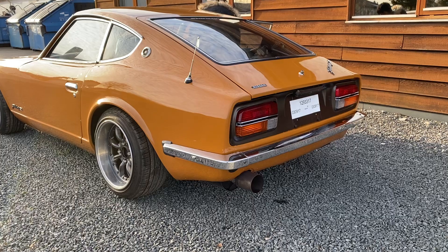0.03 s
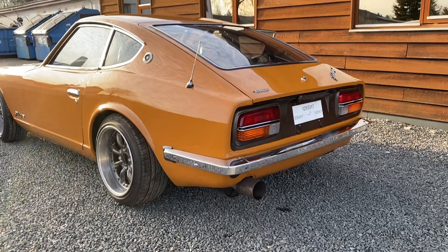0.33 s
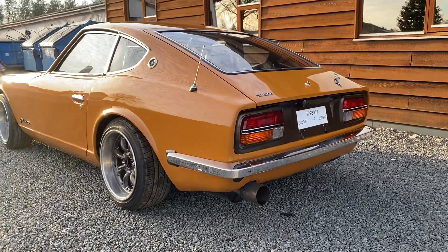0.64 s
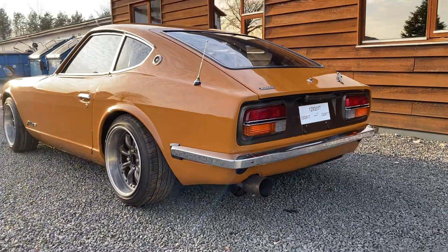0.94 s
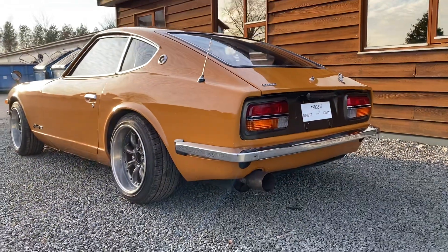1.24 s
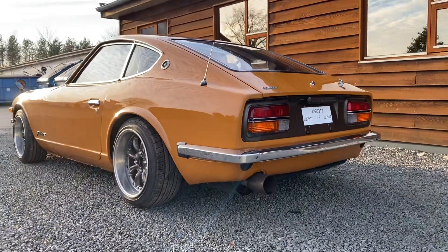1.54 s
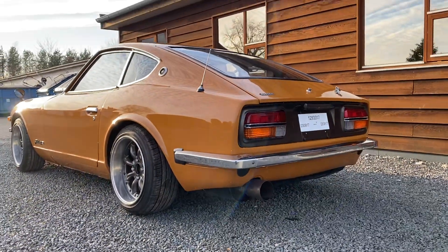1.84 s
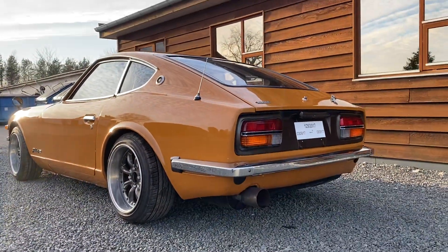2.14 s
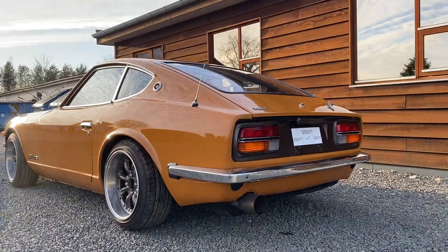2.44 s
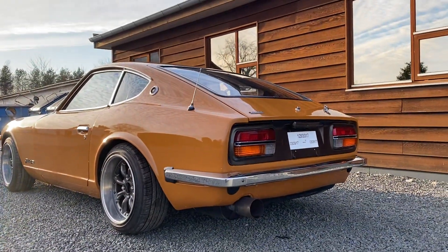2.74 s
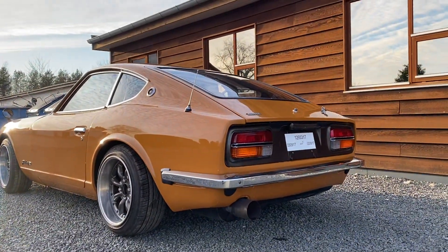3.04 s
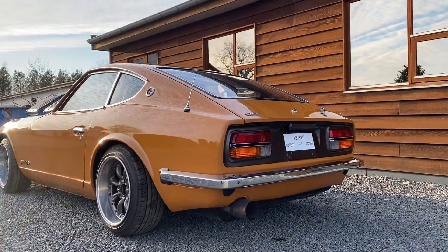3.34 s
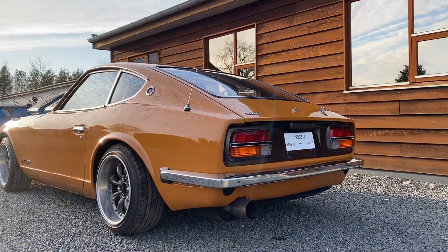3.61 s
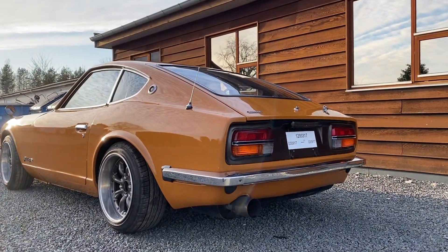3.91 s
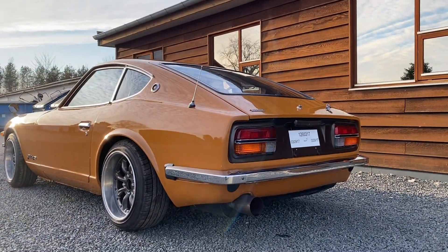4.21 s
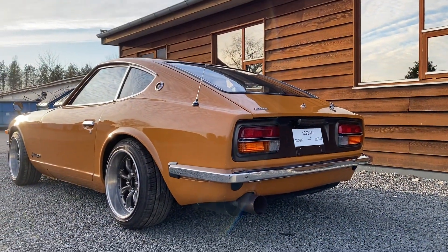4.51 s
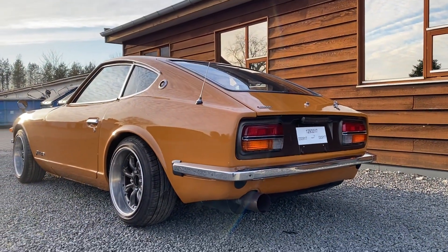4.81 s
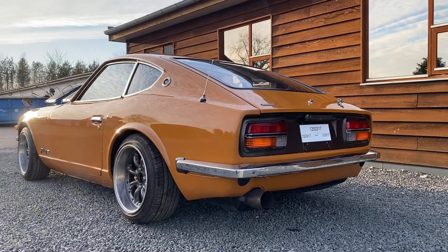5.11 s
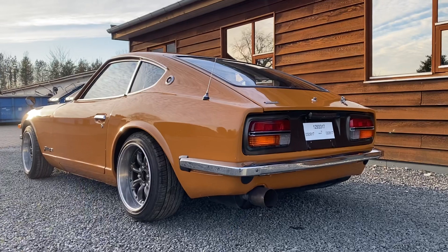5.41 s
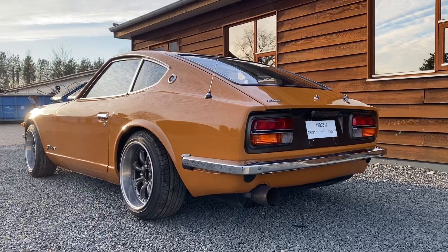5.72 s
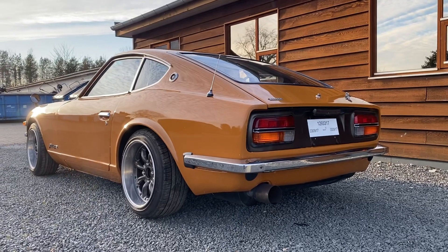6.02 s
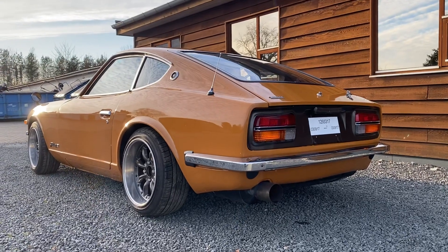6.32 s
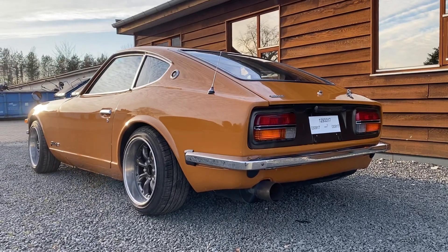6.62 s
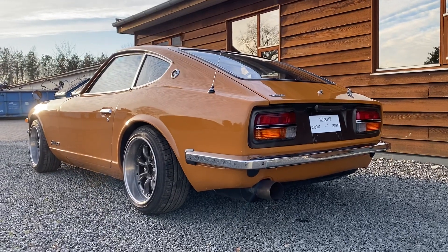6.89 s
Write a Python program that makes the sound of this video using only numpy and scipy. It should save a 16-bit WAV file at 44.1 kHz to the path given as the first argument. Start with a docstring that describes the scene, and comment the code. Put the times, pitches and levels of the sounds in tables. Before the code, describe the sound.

After a short crackle, a sports car's six-cylinder engine idles unevenly, with a booming exhaust, light ticking and a small bird calling very faintly. Two smooth revs follow about two seconds apart, the second rising higher into a raspy snarl. Each sinks away with burbles, small exhaust pops and soft whines. The microphone is just behind the car, in an open gravel yard with little echo.

```python
"""A short crackle, then a lumpy idle: a straight-six sports car parked on gravel in a yard, with the
microphone behind its tailpipe. Firing pulses boom in the silencer, valves tick, thin steel rings and a
small bird calls faintly. Revved twice, the carburettors roar and the pipe blares; as the revs sink it
burbles, whines and pops with unburnt fuel. A wooden wall answers, and a limiter holds the peaks down."""
import sys
import numpy as np
from scipy import signal
from scipy.fft import rfft, irfft, next_fast_len
from scipy.io import wavfile
from scipy.ndimage import uniform_filter1d, minimum_filter1d, map_coordinates

SR = 44100
rng = np.random.default_rng(int(sys.argv[2]) if len(sys.argv) > 2 else 0)


def file_out(sig):
    """Save sig as 16-bit WAV at sys.argv[1]."""
    # one column per channel
    cols = np.atleast_2d(sig).T
    # limit, then scale
    lim = np.clip(cols, -1, 1)
    pcm = np.round(lim * 32767).astype(np.int16)
    wavfile.write(sys.argv[1], SR, pcm)


N = 306495
TIME = np.arange(N) / SR
IDLE_HZ = 67.2  # firing rate at idle, six firings to an engine cycle

# blips of the throttle: opens t/s, shuts t/s, climb of the firing rate/(Hz per s)
BLIPS = [(2.835, 3.49, 205), (4.765, 5.472, 244)]
# cylinders in firing order: relative strength, lateness/firings
CYLINDERS = [(1.079, 0), (0.63, .08), (0.822, -0.019), (0.92, .11), (0.99, -.07), (1.1, .04)]
# gas noise in the exhaust: firing rate f/Hz, throttle open level/dB, throttle shut level/dB
GAS_FLOW = [(68, -26, -35), (114, -28, -35), (154, -25, -32), (182, -24.5, -29), (242, -21, -24),
            (270, -19.5, -19.5)]


def amp(db):
    """Decibels to gain."""
    return 10 ** (np.asarray(db) / 20)


def ramp(x):
    """Limit to the range 0-1."""
    return np.clip(x, 0, 1)


def unit(x):
    """Scale to rms 1."""
    return x / np.sqrt(np.mean(x ** 2) + 1e-20)


def steady(x, span_s):
    """Hold the running rms near 1."""
    size = max(int(span_s * SR / 2), 8)
    return x / np.sqrt(np.abs(uniform_filter1d(uniform_filter1d(x ** 2, size), size)) + 1e-12)


def along(points, hz):
    """Read (f/Hz, value) points on a log frequency axis."""
    f, value = np.transpose(points)
    return np.interp(np.log(hz + 1), np.log(f + 1), value)


def mapped(table, rate, throttle):
    """Level in dB at this firing rate, between the shut and the open throttle."""
    hz, open_db, shut_db = np.transpose(table)
    return throttle * np.interp(rate, hz, open_db) + (1 - throttle) * np.interp(rate, hz, shut_db)


def wobble(rate):
    """A smooth random curve, rate knots a second."""
    return map_coordinates(rng.standard_normal(int(N * rate / SR) + 4), [TIME * rate])


def fade(kicks, decay_s):
    """Each kick dies away exponentially."""
    return signal.lfilter([1], [1, -np.exp(-1 / (decay_s * SR))], kicks)


def filtered(x, response):
    """Filter x by a function of frequency."""
    size = next_fast_len(N + SR // 2)
    return irfft(rfft(x, size) * response(np.fft.rfftfreq(size, 1 / SR)), size)[..., :N]


def ring(x, colour, size=16384):
    """Send pulses through a minimum-phase body of this colour."""
    cepstrum = irfft(np.log(amp(along(colour, np.fft.rfftfreq(size, 1 / SR)))))
    cepstrum[1:size // 2] *= 2
    cepstrum[size // 2 + 1:] = 0
    return signal.fftconvolve(x, irfft(np.exp(rfft(cepstrum))))[:N]


def rush(colour, gate):
    """Gated, coloured stereo noise of rms 1, widest around 2 kHz."""
    # likeness of left and right at the microphone: f/Hz, correlation
    likeness = [(120, 0.63), (250, 0.77), (500, 1), (1000, 0.77), (2000, 0.51), (4000, 0.91), (8000, 0.94)]
    angle = lambda hz: np.arccos(np.clip(along(likeness, hz), -1, 1)) / 2
    response = lambda hz: amp(along(colour, hz)) * [np.cos(angle(hz)), np.sin(angle(hz))]
    mid, side = filtered(rng.standard_normal((2, N)) * gate, response)
    return unit(np.array([mid + side, mid - side]))


def pulses(phase, places, sizes):
    """One impulse wherever the phase passes one of the places."""
    samples = np.interp(places, phase, np.arange(N)).astype(int)
    return np.bincount(samples, sizes, N) * (TIME > 0) * (TIME < TIME[-1])


def tone(phase, fitful):
    """A tone of rms about 1; its fitful share drifts in strength and phase."""
    drift = (wobble(13) + 1j * wobble(13)) / np.sqrt(2)
    envelope = np.sqrt(1 - ramp(fitful)) + np.sqrt(ramp(fitful)) * drift
    return np.sqrt(2) * np.real(envelope * np.exp(2j * np.pi * phase))


def glides(notes, flicker):
    """Thin, unsteady tones that swell and fade while bending through three pitches."""
    song = np.zeros(N)
    for start, length, *pitches, db in notes:
        progress = ramp((TIME - start) / length)
        hz = np.polyval(np.polyfit([0, .5, 1], pitches, 2), progress)
        song += amp(db) * np.sin(np.pi * progress) * np.sin(2 * np.pi * np.cumsum(hz) / SR)
    return song * (1 + flicker * wobble(55))


def crackles(click_db=-1, knock_db=-2, grains_per_s=2200):
    """Sharp clicks and knocks of gravel and engine rattle; clusters of tiny grains crackle and crunch."""
    # gravel, and engine rattle as the throttle opens: t/s, level/dB, knock's extra level/dB
    hits = [(0.448, -36.5, -0.5), (0.634, -36, 3.5), (0.757, -35, 0), (0.7734, -27, -2.5),
            (0.9485, -31, 5.5), (1.433, -28, -7), (1.7726, -34, -0.5), (2.222, -35.5, 2.5),
            (2.416, -32, -5.5), (2.7804, -34, -3.5), (2.807, -35.5, 8), (2.8894, -27, -2.5),
            (4.1617, -32.5, -4.5), (4.437, -37.5, 5), (4.601, -33.5, -2), (4.8026, -23, -1.5)]
    # a short crackle at the very start, then faint gravel crunches: middle t/s, length/s, level/dB
    bursts = [(0.018, 0.061, -34), (0.64, 0.058, -48.5), (.72, .025, -39.5), (0.764, 0.025, -42.5)]
    # colours of click, crunch and knock: f/Hz, level/dB
    click_colour = [(600, -20), (1500, 10), (3000, 10.5), (6500, -4.5), (12000, -15), (15500, -16.5)]
    crunch_colour = [(700, -5), (1600, 8), (4000, -1), (7000, -6.5), (12000, -1), (15500, -7.5)]
    knock_colour = [(400, -7.5), (950, 3.5), (1500, 6.5), (2100, -0.5), (3500, -27)]
    clicks, knocks = np.zeros((2, N))
    for t, db, body_db in hits:
        clicks[int(t * SR)] = amp(db + click_db)
        knocks[int(t * SR)] = amp(db + body_db + knock_db)
    grains = (rng.random(N) < grains_per_s / SR) * amp(3 * rng.standard_normal(N))
    swell = sum(amp(db) * np.exp(-2 * ((TIME - t) / length) ** 2) for t, length, db in bursts)
    click = fade(clicks, decay_s=.0017) * rush(click_colour, 1)
    crunch = steady(fade(grains, decay_s=.00065), 0.27) * swell * rush(crunch_colour, 1)
    knock = fade(knocks, decay_s=.0046) * rush(knock_colour, 1)
    return click + crunch + knock


def pedal(open_s=0.16, shut_s=0.05):
    """Throttle opening 0-1: open, hold and shut for each blip."""
    return sum(ramp(.5 + (TIME - opens) / open_s) * ramp(.5 - (TIME - shuts) / shut_s)
               for opens, shuts, _ in BLIPS)


def crank(throttle, coast_s=1.8, sag_hz=7, boom_hz=205, hunt_hz=.6, flutter_hz=.9):
    """Firing rate in Hz: it climbs while the throttle is open, then friction runs it down."""
    rate = np.full(N, IDLE_HZ)
    for opens, shuts, climb in BLIPS:
        pulled = rate[int(opens * SR)] + climb * (np.minimum(TIME, shuts) - opens)
        rate = np.where(TIME > opens, pulled * np.exp(-np.maximum(TIME - shuts, 0) / coast_s), rate)
    rate -= sag_hz * throttle * np.exp(-((rate - boom_hz) / 24) ** 2)  # back-pressure at the boom
    return uniform_filter1d(rate, size=SR // 20) + hunt_hz * wobble(4) + flutter_hz * wobble(24)


def off_idle(rate):
    """0 at idle, rising to 1 at 97 firings a second."""
    return ramp((rate - 72) / 25)


def unevenness(rate, throttle, starve_hz=237.8, pull_hz=175, surge_db=2):
    """How roughly the engine runs, blended from idling, coasting, starving and pulling."""
    # burble level/dB, single cylinders level/dB, bank imbalance level/dB
    idling, coasting, starving = (-15, -58, -52), (-15, -18.5, -17), (-20.5, -15, -8.5)
    pulling, pull_per_octave = (-22, -13.5, -19.5), (-7, 4.5, 13.5)
    fast = off_idle(rate)
    starved = ramp(.5 + (rate - starve_hz) / 6)  # coasting this fast, one bank of three drops out
    shut = np.outer(idling, 1 - fast) + np.outer(coasting, fast - starved) + np.outer(starving, starved)
    loaded = np.array(pulling)[:, None] + np.outer(pull_per_octave, np.log2(rate / pull_hz))
    burble_db, single_db, bank_db = throttle * loaded + (1 - throttle) * shut
    moving = np.sin(np.pi * throttle)  # peaks at half travel
    return burble_db + surge_db * moving, single_db, bank_db


def exhaust_note(rate, phase, throttle, burble_db, single_db, bank_db, misfire_s=0.012, dull_db=4):
    """The firing rate booms in the silencer; unequal cylinders add tones between its multiples."""
    # silencer boom: firing rate f/Hz, throttle open level/dB, throttle shut level/dB
    boom_levels = [(70.4, -1, -8), (104, -4, -19.5), (125, -2.5, -16), (150, -5, -19), (195, -5, -12),
                   (199, -2.5, -22), (222.5, -15.5, -24), (275, -21, -25)]
    # silencer response: f/Hz, level/dB
    silencer = [(25, -22), (55, -15), (85, -2.5), (205, 0.5), (250, 1.5), (300, -0.5), (380, -6.5),
                (480, -37), (900, -25)]
    # missed charges at idle: t/s, depth 0-1
    misfires = [(0.182, 0.97), (0.213, 1), (.35, 0.8), (0.396, 0.64), (0.576, 0.7), (.65, 0), (0.809, .9),
                (.885, 0), (0.988, 1), (1.115, 0.7), (1.22, 0.6), (1.446, 0.6), (1.56, 0.5), (1.625, 0.2),
                (1.744, 0.6), (1.791, 0.9), (1.86, 0.4), (1.92, 0.14), (1.995, 0.77), (2.154, 0.63),
                (2.187, 0.74), (2.35, 0.8), (2.515, 0.87)]
    # tones of unequal cylinders: multiple of the cycle rate, level/dB
    lope_orders = [(2, 1.5), (4, 2), (5, -5.5), (7, -6), (8, -8), (9, -7.5)]
    pipe = lambda multiple: amp(along(silencer, multiple * rate))
    idling = ramp((112 - rate) / 18)
    # at low revs some charges burn poorly
    weak = np.minimum(0.014 * rng.exponential(size=int(phase[-1]) + 2) ** 2.8, 1)
    strength = 1 - idling * map_coordinates(weak - weak.mean(), [phase])
    strength *= 1 + idling * 0.055 * wobble(IDLE_HZ)
    strength *= 1 - ramp(sum(depth * np.exp(-((TIME - t) / misfire_s) ** 2) for t, depth in misfires))
    # overtones skew each pressure wave, no two with the same edge
    overtones = np.zeros(N)
    for k, db in [(2, -6), (3, -15)]:
        level = np.sqrt(2) * amp(db + 2 * wobble(40)) * pipe(k)
        skew = -0.56 + 0.25 * wobble(45)
        overtones += level * np.cos(2 * np.pi * k * phase + (k - 1) * skew)
    # with the throttle shut above idle, misfires make the tones come and go
    shut = 1 - ramp(2 * throttle)
    fitful = 0.92 * ramp((burble_db + 25) / 6) * (1 - idling) * shut
    wave = tone(phase, fitful / 2) + np.maximum(idling, .1) * overtones
    boom = amp(mapped(boom_levels, rate, throttle)) * strength * wave
    count, lope = len(CYLINDERS), np.zeros(N)
    for k, db in lope_orders:
        level = amp(db - dull_db * shut * np.log2(k / 2)) * pipe(k / count)  # duller without load
        lope += level * tone(k * phase / count + rng.random(), np.clip(fitful, .1, 1))
    return boom + amp(bank_db) * tone(phase / 2, fitful) + amp(single_db) * steady(lope, 0.69)


def burble(rate, phase, burble_db, idle_db=-1, coast_db=4, flare_db=6.5):
    """Charges of random strength thump through the pipe; above idle a few flare far above the rest."""
    # colour of the pipe at idle and at higher revs: f/Hz, level/dB
    idle_colour = [(25, -19), (45, -28.5), (62, 0), (90, 9), (115, -2.5), (175, 3), (205, -9), (245, -12.5),
                   (305, -6), (370, -28.5), (600, -78)]
    coast_colour = [(25, -65), (42, -9.5), (58, 13), (80, 9.5), (115, 5), (150, 1), (200, 5.5),
                    (245, -15.5), (305, -5), (380, -40.5), (650, -78)]
    firing = np.arange(int(phase[-1]))
    late, size, flare = rng.standard_normal((len(firing), 3)).T
    thumps = pulses(phase, firing + 0.049 * late, size)
    flares = pulses(phase, firing + 0.091 * late, size * amp(flare_db * flare))
    idle = amp(idle_db) * steady(ring(thumps, idle_colour), 0.51)
    overrun = amp(coast_db) * steady(ring(flares, coast_colour), .22)
    fast = off_idle(rate)
    return amp(burble_db) * ((1 - fast) * idle + fast * overrun)


def gas(rate, phase, throttle, snarl_hz=213, snarl_span_hz=55, snarl_lag_s=.02):
    """Each exhaust valve lets out a bark and a puff of turbulence; open carburettors add intake roar."""
    # colours of exhaust rasp, intake and high-rev snarl: f/Hz, level/dB
    rasp_colour = [(200, -25.5), (330, 6.5), (410, 1.5), (540, -2.5), (650, 0), (820, -7), (1060, -8),
                   (1350, -13), (1650, -18.5), (2300, -26), (3500, -45.5), (8000, -99)]
    intake_colour = [(200, -16), (290, 11.5), (370, 13), (520, 0.5), (900, -11), (1300, -6), (1900, -5.5),
                     (2250, -26), (2900, -15.5), (5000, -55.5)]
    snarl_colour = [(220, -21.5), (360, 6.5), (430, 9.5), (540, 0.5), (640, 5), (750, 5), (900, -2.5),
                    (1120, -1), (1500, -7.5), (2200, -18), (3300, -15), (4400, -19.5), (6500, -40)]
    # two bright hisses: f/Hz, level/dB
    bright_hiss = [(1000, -43), (2000, 11), (3000, 10.5), (4400, 8.5), (5500, -3), (7500, 2.5), (9000, -20),
                   (11000, 2), (15500, -24)]
    high_hiss = [(3000, -21.5), (6500, 7), (9000, -14), (15500, 10)]
    # strength of the hiss: firing rate f/Hz, throttle open level/dB, throttle shut level/dB
    hiss_flow = [(68, -43.5, -53), (105, -46, -54.5), (194, -44.5, -45), (232, -39.5, -39.5),
                 (271, -31.5, -33)]
    # extra roar of each blip: t/s, level/dB
    effort = [(3.2, 1.4), (5.2, -0.5)]
    firing = np.arange(int(phase[-1]))
    strength, late = np.array(CYLINDERS)[firing % len(CYLINDERS)].T
    jitter, size = rng.standard_normal((len(firing), 2)).T
    barks = pulses(phase, firing + late + .035 * jitter, strength * amp(2.5 * size))
    barking = lambda colour: steady(ring(barks, colour), 0.23)
    puffs = np.exp(0.16 * np.cos(2 * np.pi * phase)) * np.interp(phase, firing, np.sqrt(strength))
    rasp = amp(-1) * rush(rasp_colour, puffs) + amp(-10) * barking(rasp_colour)
    intake = amp(-0.5) * (1.26 * rush(intake_colour, puffs) + 0.5 * barking(intake_colour))
    # the barks harden into a snarl near the top of the revs
    top = ramp((np.interp(TIME - snarl_lag_s, TIME, rate) - snarl_hz) / snarl_span_hz)
    snarl = amp(-6) * (rush(snarl_colour, puffs ** 2) + barking(snarl_colour))
    roar = (0.98 + 0.095 * throttle) * (1 - top / 2) * rasp + top * snarl
    roar += throttle * (1 + 0.14 * top) * intake
    hiss = rush(bright_hiss, puffs) + amp(-7) * throttle * barking(bright_hiss)
    hiss += amp(-7) * (rate / rate.max() + .45 * throttle) * rush(high_hiss, puffs ** .5)
    roar_db = mapped(GAS_FLOW, rate, throttle) + throttle * np.interp(TIME, *np.transpose(effort))
    hiss_db = mapped(hiss_flow, rate, throttle)
    return amp(roar_db + 0.44 * wobble(12)) * roar + amp(hiss_db + 0.69 * wobble(13)) * hiss


def afterblow(rate, throttle, thumps, blow_db=-3, idle_share=0.43):
    """With the throttle shut, every thump pushes a gust through the tailpipe, which rings hollow."""
    # colour of the tailpipe: f/Hz, level/dB
    hollow = [(200, -11), (310, 7.5), (400, -9), (480, 5.5), (560, -1.5), (660, 1), (900, -4), (1045, -4),
              (1130, -3.5), (1380, -11.5), (1620, -9), (2300, -25), (5000, -52)]
    push = np.abs(uniform_filter1d(steady(thumps, 1.0) ** 2, size=400)) ** 0.2
    share = (1 - throttle) * np.maximum(off_idle(rate), idle_share)
    return amp(mapped(GAS_FLOW, rate, throttle) + blow_db) * share * rush(hollow, push)


def valves(rate, phase, throttle, tick_db=-54, rattle_db=-38):
    """Tappets tick unevenly, twice a firing; a throttle opened at low revs rattles on every firing."""
    # bright tick: f/Hz, level/dB
    bright_tick = [(1000, -12.5), (1800, 4.5), (2800, 11), (6500, 1), (9000, -19.5), (15500, -12)]
    # rattle, strongest near 3 kHz: f/Hz, level/dB
    rattle_colour = [(1000, -14.5), (2800, 6), (4200, -0.5), (6300, -0.5), (9000, -14), (15500, -21.5)]
    firing = np.arange(int(phase[-1]))
    hard, soft = amp(np.minimum(4.5 * rng.standard_normal((len(firing), 2)), 8)).T
    taps = pulses(phase, firing + .3, hard) + pulses(phase, firing + .72, soft / 2)
    spits = np.exp(1.6 * np.cos(2 * np.pi * phase)) * amp(4 * wobble(70))
    lugging = ramp(1.5 * throttle) * ramp((104 - rate) / 26)
    ticks = rush(bright_tick, fade(taps, decay_s=0.0012))
    return amp(tick_db) * ticks + amp(rattle_db) * lugging * rush(rattle_colour, spits)


def tinwork(rate, throttle, ring_db=-9, idle_share=0.55):
    """The gas flow shakes the exhaust's thin steel, which rings at its own pitches, least at idle."""
    # modes of the steel: f/Hz, width/Hz, level/dB
    modes = [(651, 26, 7.5), (1045, 78, 6), (1534, 35, -1.5), (1746, 12, -6), (2860, 21, -10.5),
             (3976, 37, -10.5), (4580, 22, -10), (4990, 31, -16), (6105, 44, -23.5)]
    response = lambda f: sum(amp(db) * 1j * f * width / (hz * hz - f * f + 1j * f * width)
                             for hz, width, db in modes)
    ringing = unit(filtered(rng.standard_normal(N), response))
    shaken = np.maximum(ramp(rate / IDLE_HZ - 1), idle_share)
    return amp(mapped(GAS_FLOW, rate, throttle / 2) + ring_db) * shaken * ringing


def yard(x):
    """The wooden wall and the yard send a short, diffuse answer back to the microphone."""
    # reverberation of the yard: f/Hz, t60/s
    decay_times = [(200, 0.34), (2000, 0.49), (10000, 0.11)]
    hz, t, noise = signal.stft(rng.standard_normal((2, SR // 2)), SR, nperseg=256)
    tail = signal.istft(noise * amp(-60 * t / along(decay_times, hz)[:, None]), SR, nperseg=256)[1]
    return signal.fftconvolve(x, tail / np.linalg.norm(tail[0]), axes=1)[:, :N]


def bird():
    """A small bird gives five high, drooping notes, faint behind the idle."""
    # notes: t/s, length/s, start f/Hz, middle f/Hz, end f/Hz, level/dB
    notes = [(0.13, 0.12, 7900, 7400, 6800, -60), (0.29, 0.1, 7550, 7400, 7040, -54),
             (0.465, 0.085, 7440, 7500, 7050, -54), (0.645, 0.13, 7400, 7400, 7100, -53),
             (0.99, .16, 7550, 7140, 6950, -50.5)]
    return glides(notes, flicker=.25)


def whines():
    """Soft whines and whistles come through as the revs run down; at 5.5 s a glide rides the blare."""
    # whines, and at 5.5 s a tone on the tenth multiple of the cycle rate: t/s, length/s, start f/Hz, middle
    # f/Hz, end f/Hz, level/dB
    notes = [(3.33, 0.66, 390, 403, 363, -25.5), (5.5, .18, 452, 430, 410, -24),
             (5.87, 0.13, 1010, 970, 970, -33), (6.39, 0.22, 1048, 1028, 1045, -37)]
    return glides(notes, flicker=.34)


def blare(rate, phase, throttle, open_hz=204.2, shut_hz=244.6, span_hz=30.4, stagger_hz=2.1, bank_db=3):
    """At high revs the pipe blares on multiples of the cycle rate, most on those of one bank."""
    # colour of the blare: f/Hz, level/dB
    colour = [(250, -33), (310, -28.5), (365, -20.5), (420, -26), (475, -33.5), (540, -27), (620, -30.5),
              (735, -29), (850, -40), (1050, -35.5), (1300, -38.5), (1500, -40)]
    count, sound = len(CYLINDERS), np.zeros(N)
    for k in range(count + 1, 5 * count + 1):
        # under throttle each higher tone sets in at a higher firing rate
        onset_hz = throttle * (open_hz + stagger_hz * (k - count)) + (1 - throttle) * shut_hz
        db = along(colour, k * rate / count) + bank_db * (k % (count // 2) == 0)
        level = ramp((rate - onset_hz) / span_hz) * amp(db)
        sound += level * tone(k * phase / count + rng.random(), fitful=0.3)
    return sound


def sputters(gust_db=-5, thud_db=-2):
    """Unburnt fuel flares in the pipe: one pressure kick, then a short gust."""
    # pops with the throttle shut: t/s, level/dB, decay/s
    pops = [(3.892, -16, 0.015), (4.005, -17, 0.025), (4.135, -14, 0.027), (4.166, -21.5, 0.024),
            (4.472, -16.5, .012), (6.222, -20.5, 0.028), (6.412, -13, 0.014), (6.686, -24.5, 0.016),
            (6.868, -22, 0.012)]
    # colour of a pop: f/Hz, level/dB
    colour = [(30, -8), (80, -2), (200, 7), (380, 6), (600, 3), (800, -13.5), (1060, -14.5), (1650, -19.5),
              (3500, -31.5), (8000, -61)]
    kicks, gusts = np.zeros((2, N))
    for t, db, decay in pops:
        kicks[int(t * SR)] = amp(db)
        gusts += amp(db) * (TIME >= t) * np.exp(-np.abs(TIME - t) / decay)
    thuds = ring(kicks, colour)
    thuds *= kicks.max() / np.abs(thuds).max()
    return amp(gust_db) * gusts * rush(colour, 1) + amp(thud_db) * thuds


def microphone(x):
    """At the stereo microphone the upper middle leans left, and the left side leads by one sample."""
    # balance: f/Hz, left minus right level/dB
    lean = [(250, -3), (500, 0), (1000, 2.5), (2000, 3), (4000, 5.5), (8000, -0.5)]
    balance = lambda hz: amp(np.outer([.5, -.5], along(lean, hz)))
    lead = lambda hz: np.exp(1j * np.pi * np.outer([1, -1], hz) / SR)
    return filtered(x, lambda hz: balance(hz) * lead(hz))


def scene():
    """From behind the car: the deep exhaust in the centre, brighter sounds spread, the yard around."""
    throttle = pedal()
    rate = crank(throttle)
    phase = np.cumsum(rate) / SR  # counts firings
    burble_db, single_db, bank_db = unevenness(rate, throttle)
    thumps = burble(rate, phase, burble_db)
    deep = thumps + exhaust_note(rate, phase, throttle, burble_db, single_db, bank_db)
    deep += blare(rate, phase, throttle) + whines()
    bright = gas(rate, phase, throttle) + afterblow(rate, throttle, thumps) + sputters()
    bright += valves(rate, phase, throttle) + tinwork(rate, throttle) + crackles() + bird()
    return deep + microphone(bright) + yard(amp(-28) * deep + amp(-12) * bright)


def record(dry, ceiling=0.94, hold_s=0.006, start_s=.034, top_hz=15830):
    """A fast limiter holds the peaks; the sound fades in at once and the highest treble is cut."""
    size = int(hold_s * SR)
    needed = np.minimum(1, ceiling / (np.abs(dry).max(axis=0) + 1e-9))
    gain = uniform_filter1d(minimum_filter1d(needed, size), size)
    fade_in = ramp((TIME - start_s) / .004)
    return filtered(dry * gain * fade_in, lambda hz: hz < top_hz)


dry = scene()
out = record(dry)
file_out(out)
```